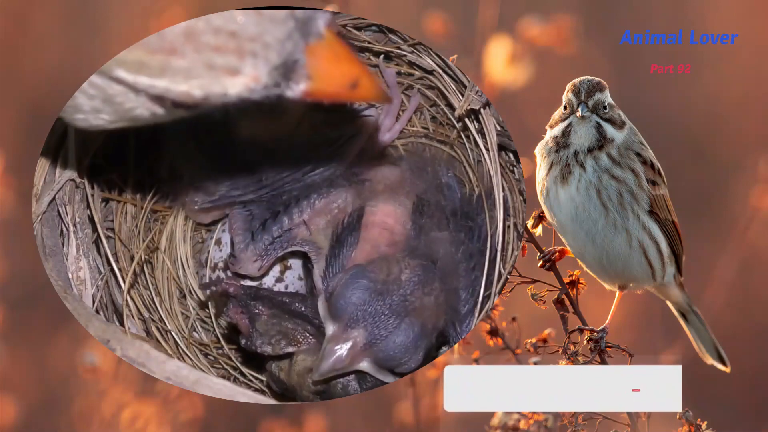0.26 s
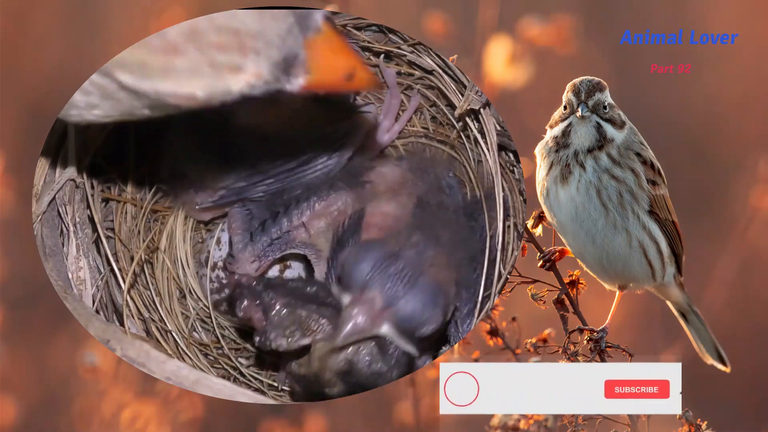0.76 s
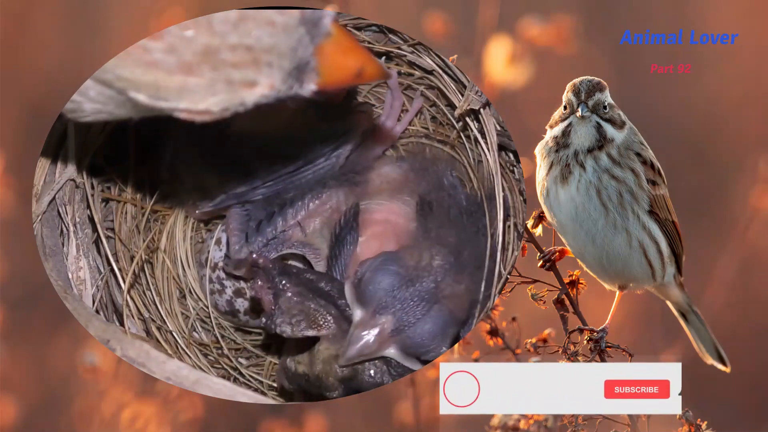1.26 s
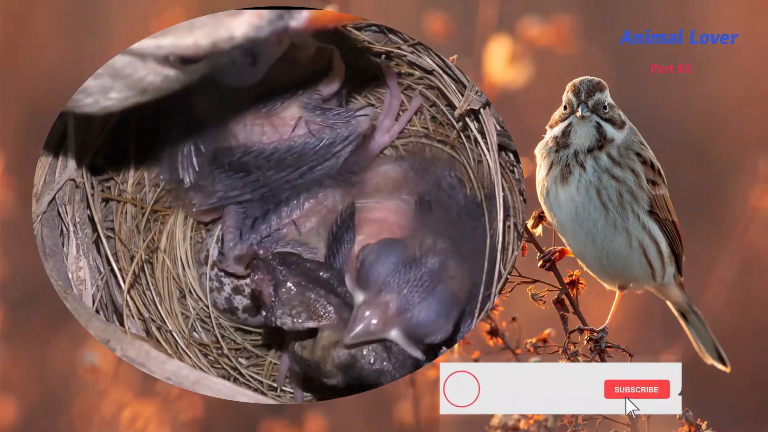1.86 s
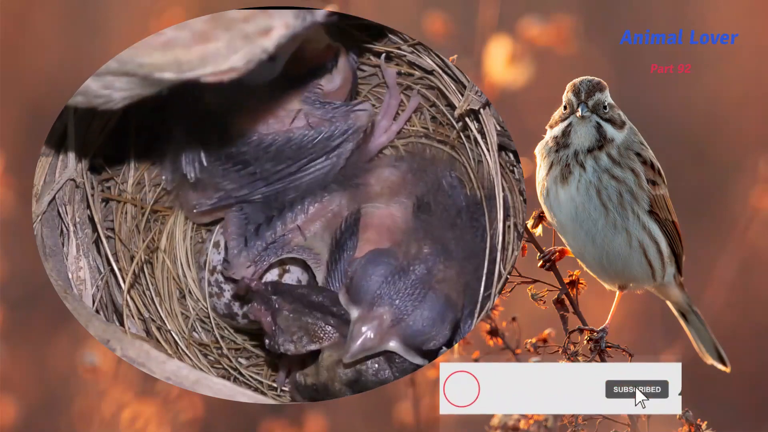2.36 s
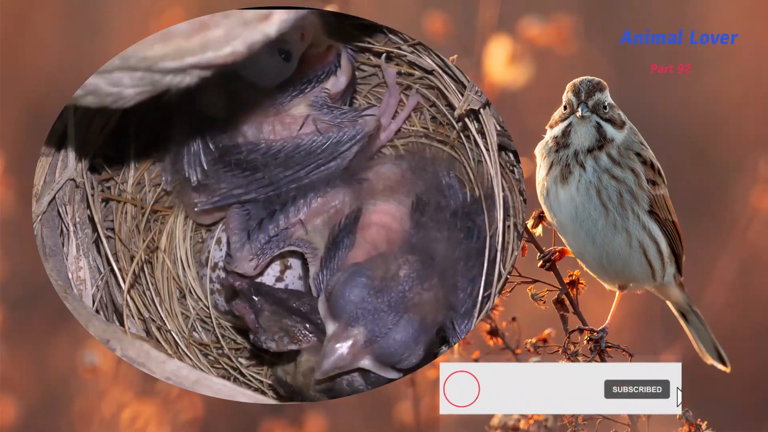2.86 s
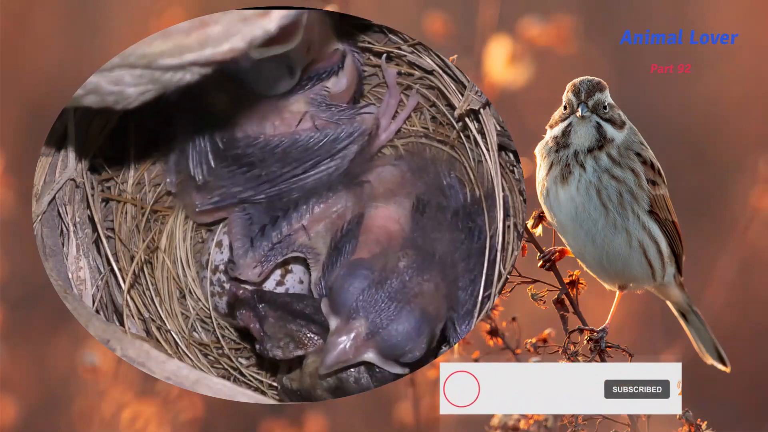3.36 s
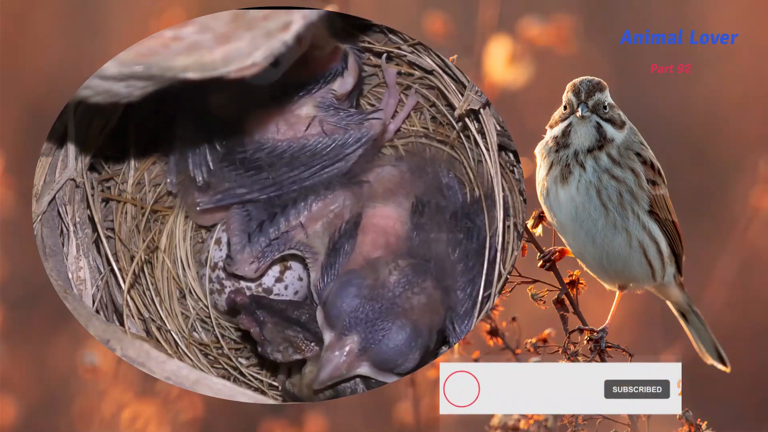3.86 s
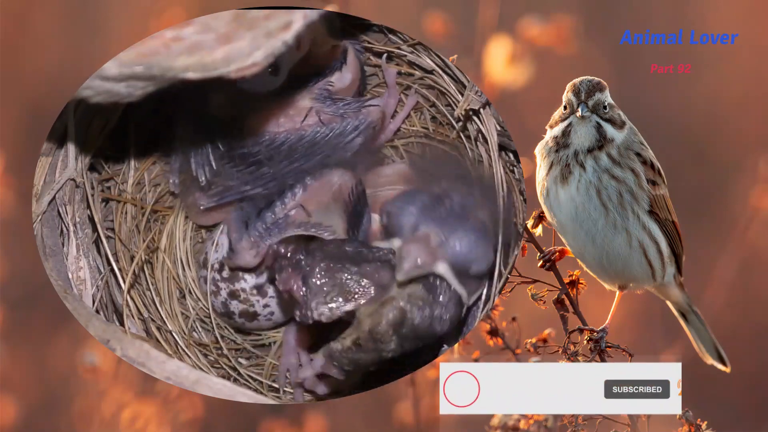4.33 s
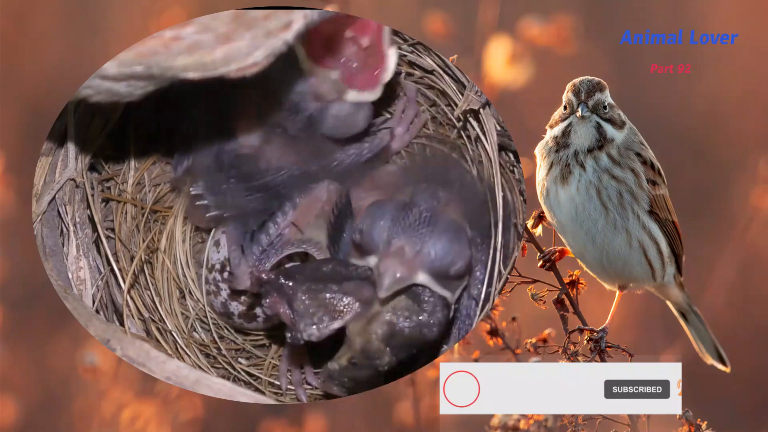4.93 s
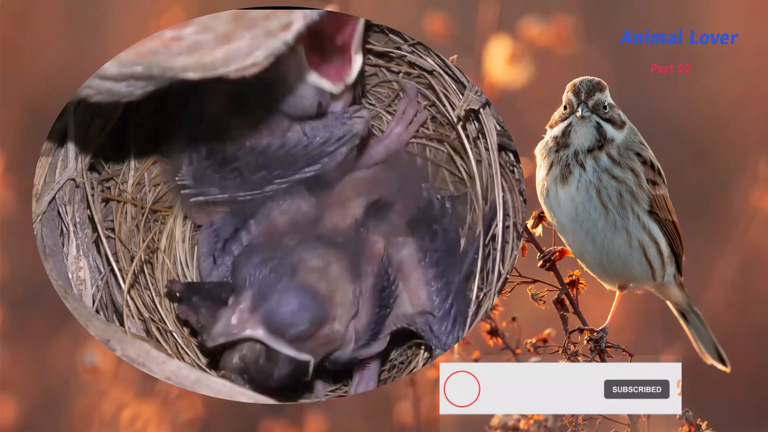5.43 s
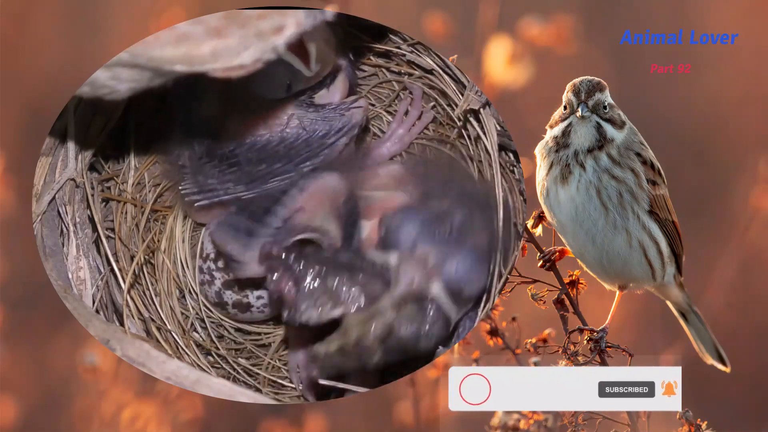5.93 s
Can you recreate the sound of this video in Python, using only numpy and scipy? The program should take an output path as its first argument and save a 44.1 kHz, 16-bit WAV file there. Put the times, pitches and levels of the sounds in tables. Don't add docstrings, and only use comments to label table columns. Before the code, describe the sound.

Very high, needle-thin chick squeaks come in four short groups, with tiny beak puffs and straw ticks above distant rumbling vehicles.

```python
import sys
import numpy as np
from scipy import signal
from scipy.fft import rfft, irfft, next_fast_len
from scipy.io import wavfile
from scipy.ndimage import uniform_filter1d, map_coordinates

SR = 44100
rng = np.random.default_rng(int(sys.argv[2]) if len(sys.argv) > 2 else 0)


def inscribe(sig):
    pcm = np.round(np.clip(np.atleast_2d(sig).T, -1, 1) * 32767)
    wavfile.write(sys.argv[1], SR, pcm.astype(np.int16))


def linear_from_db(decibels):
    return 10 ** (np.asarray(decibels, float) / 20)


N = 272979
T = np.arange(N) / SR


def unit(x):
    return x / np.sqrt(np.mean(x ** 2) + 1e-20)


def along(points, hz):
    f, v = np.transpose(points)
    return np.interp(np.log(hz + 1), np.log(f + 1), v)


def wobble(rate):
    knots = rng.standard_normal(int(N * rate / SR) + 4)
    return map_coordinates(knots, [T * rate])


def filtered(x, response):
    m = next_fast_len(x.shape[-1] + 8192)
    shaped = rfft(x, m) * response(np.fft.rfftfreq(m, 1 / SR))
    return irfft(shaped, m)[..., :x.shape[-1]]


def curved(s, value, t):
    rise = np.diff(value)
    slopes = np.pad(rise / np.diff(s), 1, "edge")
    before, after = slopes[:-1], slopes[1:]
    slope = 2 * np.clip(before * after, 0, None) / (before + after + 1e-9)
    k = np.clip(np.searchsorted(s, t) - 1, 0, len(s) - 2)
    step = s[k + 1] - s[k]
    u = (t - s[k]) / step
    leave = (1 - u) * (slope[k] * step - rise[k])
    arrive = u * (slope[k + 1] * step - rise[k])
    return value[k] + u * rise[k] + u * (1 - u) * (leave - arrive)


def rush(spectrum, alike, patchy_db):
    z = signal.stft(rng.standard_normal((2, N)), nperseg=1024)[2]
    field = uniform_filter1d(rng.standard_normal(z.shape[1:]), size=4, axis=0)
    field = uniform_filter1d(field, size=8, axis=1)
    pair = signal.istft(z * linear_from_db(patchy_db * unit(field)), nperseg=1024)[1][:, :N]

    def mid_side(hz):
        turn = np.arccos(np.clip(along(alike, hz), -1, 1)) / 2
        return linear_from_db(along(spectrum, hz)) * [np.cos(turn), np.sin(turn)]

    mid, side = filtered(pair, mid_side)
    return unit(np.array([mid + side, mid - side]))


def glides(rows, shoulder):
    out = np.zeros(N)
    for s, length, first_hz, last_hz, db in rows:
        on = (T >= s) & (T < s + length)
        u = (T[on] - s) / length
        hz = first_hz + (last_hz - first_hz) * u
        phase = 2 * np.pi * (np.cumsum(hz) / SR + rng.random())
        swell = np.abs(np.sin(np.pi * u)) ** shoulder
        out[on] += np.sqrt(2) * linear_from_db(db) * swell * np.sin(phase)
    return out


# frequency in Hz, density in dB per Hz.
AIR_HISS = [(25, -15.5), (2000, -0.5), (5500, -2.5), (10000, -1), (15700, -3), (15800, -120)]


def air():
    alike = [(3000, .3), (5000, 0.34), (5900, 0.99), (9000, 0.82), (9900, 0.9), (15000, 0.054)]
    return linear_from_db(-69.5) * rush(AIR_HISS, alike, patchy_db=-1.5)


# time in seconds, heavy engines, vans and light engines in dB.
TRAFFIC_SWELLS = [(0.0, -55, -59, -60), (0.05, -50.5, -58, -57.5), (1.28, -45.5, -47, -53.5),
                  (1.4, -50, -61, -57.5), (1.48, -45, -50, -58), (1.9, -53.5, -57, -57.5),
                  (2.88, -53, -58.5, -57.5), (3.1, -45.5, -56, -55.5), (3.69, -49, -48, -58),
                  (3.72, -49, -55, -55.5), (3.88, -44.5, -45, -53), (3.91, -39.5, -49.5, -56.5),
                  (4.14, -52.5, -50.5, -53), (4.43, -42.5, -44.5, -47.5), (4.69, -49, -51, -52),
                  (5.17, -47, -50.5, -56), (6.17, -55, -62.5, -57.5), (6.19, -57, -64.5, -59)]
# frequency in Hz, density in dB per Hz.
HEAVY_DRONE = [(18, -58.5), (30, -23.5), (48, -22), (79, -7), (102, 1), (124, 2), (170, -15), (220, -37.5),
               (370, -120)]
# frequency in Hz, density in dB per Hz.
VAN_DRONE = [(88, -39), (150, -8), (198, 1), (240, -2.5), (290, -31), (400, -120)]
# frequency in Hz, density in dB per Hz.
LIGHT_DRONE = [(150, -120), (220, -27.5), (262, -8), (296, -2.5), (372, -12), (426, -11.5), (550, -23.5),
               (720, -52.5), (1210, -120)]
# frequency in Hz, density in dB per Hz.
TYRE_ROAR = [(300, -11.5), (500, 0.5), (700, -2), (1300, 0), (1900, -3), (2300, -6), (3500, -11.5),
             (5500, -22), (9000, -49.5)]
# frequency in Hz, left-right likeness from 0 to 1.
TRAFFIC_ALIKE = [(30, .35), (60, 0.94), (130, 0.97), (290, 0.89), (640, 0.86), (1410, .62), (3100, .35)]


def traffic():
    s, *levels = np.transpose(TRAFFIC_SWELLS)
    heavy_db, van_db, light_db = (.9 * np.interp(T, s, level - level.mean()) for level in levels)
    heavy = rush(HEAVY_DRONE, TRAFFIC_ALIKE, patchy_db=0.7) * linear_from_db([[.7], [-.7]])
    vans = rush(VAN_DRONE, TRAFFIC_ALIKE, patchy_db=0.45) * linear_from_db([[-.8], [.8]])
    light = rush(LIGHT_DRONE, TRAFFIC_ALIKE, patchy_db=1.2) * linear_from_db([[-1.2], [1.2]])
    tyres = rush(TYRE_ROAR, TRAFFIC_ALIKE, patchy_db=1.1) * linear_from_db([[.3], [-.3]])
    out = linear_from_db(-47.5 + heavy_db + 0.29 * wobble(26)) * heavy
    out += linear_from_db(-52 + van_db + 0.3 * wobble(17)) * vans
    out += linear_from_db(-54.5 + light_db + 0.25 * wobble(7.7)) * light
    return out + linear_from_db(-59.5 + 0.39 * wobble(9.8)) * tyres


# frequency in Hz, width in Hz, level in dB, start in seconds.
MACHINE_TONES = [(641, 13, -79, -3), (1285, 8, -71.5, -0.5), (1330, 41, -78, 5), (2563, 2.2, -79, 1.5),
                 (1828, 8.76, -75, 4.5)]


def machine():
    out = np.zeros(N)
    for hz, width_hz, db, start in MACHINE_TONES:
        phase = 2 * np.pi * np.cumsum(hz + .4 * width_hz * wobble(25)) / SR
        fade_in = np.clip((T - start) / 0.1 + (start == 0), 0, 1)
        out += np.sqrt(2) * linear_from_db(db + 2.6 * wobble(8)) * fade_in * np.sin(phase)
    return out


# start and length in seconds, first and last pitch in Hz, level in dB.
FAR_WHISTLES = [(0, .04, 8500, 8500, -75), (4.23, .09, 3600, 3280, -80), (5.22, .04, 3800, 3750, -74),
                (5.24, .07, 3760, 3420, -76), (5.285, .11, 3460, 3150, -68.5), (5.37, .12, 3180, 2640, -75),
                (4.28, .09, 3330, 3180, -79), (4.78, .09, 1290, 1340, -67), (4.8, .09, 1540, 1720, -64),
                (4.86, .1, 1640, 1700, -64.5), (4.86, .1, 1780, 1740, -66), (5.04, .06, 1780, 1700, -70),
                (4.93, .07, 1600, 1640, -68), (5.04, .07, 1600, 1660, -65), (5.1, .06, 1560, 1620, -69),
                (4.27, .1, 1250, 1290, -67), (4.39, .08, 1260, 1400, -68), (5.02, .07, 1760, 1720, -72)]


def far_birds():
    return glides(FAR_WHISTLES, shoulder=.7) * (1 + .5 * wobble(160))


def echo(x, t60, early_db, early_t60):
    out = np.zeros((2, N + SR))
    t = np.arange(SR // 2) / SR
    hop = SR // 5
    for start in range(0, N, hop):
        decay = linear_from_db(-60 * t / t60) + linear_from_db(early_db - 60 * t / early_t60)
        tail = rng.standard_normal((2, len(t))) * decay / np.sqrt(t60 * SR / 14)
        wet = signal.fftconvolve(x[None, start:start + hop], tail, axes=1)
        out[:, start + 90:][:, :wet.shape[1]] += wet
    return out[:, :N]


# start and length in seconds, lowest frequency in Hz, shared level in dB, opposed level in dB.
BEAK_PUFFS = [(1.016, .018, 3814, -57, -52.5), (1.302, 0.0099, 3000, -58.5, -65.5),
              (1.341, .008, 3000, -60, -63), (1.907, 0.023, 3000, -64.5, -72.5),
              (2.444, .011, 2590, -60.5, -56.5), (2.465, .01, 3990, -58.5, -65),
              (3.532, .011, 3300, -56.5, -49), (4.409, .008, 3510, -64, -68), (4.439, 0.03, 2504, -63, -60),
              (4.617, .012, 2577, -53, -46.5), (4.623, 0.011, 2593, -56.5, -52)]
# start and
# length in seconds, centre in Hz, level in dB.
NARROW_PUFFS = [(.018, .008, 11500, -70), (1.33, .014, 11500, -55), (1.504, .004, 11500, -66),
                (1.51, .005, 11200, -58), (1.905, .012, 4300, -67), (1.93, .03, 11500, -71),
                (1.143, .014, 9300, -46), (.764, .01, 8500, -57), (4.628, .01, 4300, -60),
                (4.552, .012, 9000, -48), (2.02, .014, 8000, -67), (2.328, .02, 10400, -58),
                (2.515, .012, 10400, -59), (4.018, .008, 11000, -68), (2.512, .014, 12200, -61),
                (3.446, .02, 11300, -62), (3.548, .02, 10700, -57), (4.51, .045, 10100, -61),
                (4.005, .02, 9000, -70), (2.444, .01, 3600, -66), (4.697, .016, 10500, -61),
                (4.408, .012, 4300, -67), (4.616, .02, 2900, -61), (4.446, .018, 2900, -65),
                (1.017, .018, 13000, -63), (4.618, .012, 12500, -56), (2.45, .025, 14500, -69),
                (4.445, .02, 14000, -67), (1.3, .016, 13400, -63), (1.285, .045, 10200, -57),
                (3.54, .03, 10600, -56), (2.305, .04, 10200, -62), (2.452, .024, 12200, -65),
                (3.425, .03, 10200, -60)]


def rustles():
    out = np.zeros((2, N))
    top_hz = 15900
    rows = []
    for s, length, low_hz, db, side_db in BEAK_PUFFS:
        rows.append((s, length, np.sqrt(low_hz * top_hz), np.log2(top_hz / low_hz) / 2, db, side_db))
    for s, length, hz, db in NARROW_PUFFS:
        rows.append((s, length, hz, .15, db, db - 3))
    for s, length, centre_hz, octaves, db, side_db in rows:
        def band(hz):
            away = np.log2((hz + 1) / centre_hz) / octaves
            return np.exp(-away ** 8) / np.sqrt(hz + 5000)

        puff = unit(filtered(rng.standard_normal((2, 2048)), band))
        swell = np.sin(np.pi * np.clip(np.arange(2048) / SR / length, 0, 1))
        mid, side = linear_from_db([[db], [side_db]]) * puff * swell
        out[:, round(s * SR):][:, :2048] += [mid + side, mid - side]
    return out


# start and length in seconds, first and last pitch in Hz, level in dB.
HELD_TONES = [(.775, .016, 9420, 9230, -37), (1.128, .015, 9520, 9400, -28), (1.332, .012, 9000, 8900, -32),
              (2.322, .02, 9240, 9400, -30), (2.514, .016, 9340, 9280, -35), (3.434, .032, 9620, 9330, -29),
              (3.602, .013, 9330, 9260, -33), (4.522, .036, 9420, 9200, -32),
              (4.684, .022, 9400, 9400, -31)]
# start and length in seconds, first and last pitch in Hz, level in dB.
STRAY_TONES = [(.727, .013, 9580, 9600, -29), (1.016, .034, 9500, 9340, -32),
               (1.306, .014, 9780, 9080, -35), (3.412, .014, 8790, 8930, -31),
               (3.534, .011, 10650, 10000, -46), (4.448, .024, 9080, 9200, -39),
               (4.497, .03, 8800, 9250, -30), (4.618, .012, 9660, 9530, -38), (.79, .012, 9550, 9650, -49),
               (4.472, .01, 11500, 11450, -56), (4.452, .024, 11600, 11500, -66)]


def second_voice():
    return glides(HELD_TONES + STRAY_TONES, shoulder=.9) * linear_from_db(2.2 * wobble(200))


# time in seconds, pitch in Hz, level in dB.
OPENING_SQUEAKS = [
    [(.690, 8760, -41), (.7, 9050, -29), (.718, 9350, -24), (.735, 9405, -22), (.743, 9590, -17.5),
     (.757, 9735, -18), (.772, 9500, -20), (.787, 8460, -38)],
    [(2.231, 8480, -46), (2.24, 9015, -41), (2.255, 9320, -33.5), (2.27, 9150, -30), (2.295, 9220, -23.5),
     (2.31, 9345, -22), (2.33, 8880, -27), (2.344, 8460, -38)],
    [(3.345, 8550, -49), (3.354, 8900, -33), (3.364, 9110, -30.5), (3.396, 8825, -15), (3.411, 8880, -15),
     (3.423, 9235, -26), (3.435, 9395, -22), (3.464, 8480, -36)],
    [(4.446, 8640, -45), (4.456, 8830, -38), (4.472, 8955, -26), (4.487, 8800, -15), (4.512, 8810, -18.5),
     (4.527, 9240, -32), (4.54, 8900, -27), (4.548, 8700, -33), (4.556, 8480, -39)],
]
# time in seconds, pitch in Hz, level in dB.
ANSWERING_SQUEAKS = [
    [(1.025, 8825, -42), (1.04, 9110, -30), (1.053, 9130, -25), (1.075, 9220, -26), (1.092, 9425, -17),
     (1.122, 9530, -19), (1.141, 8750, -29)],
    [(1.262, 9455, -44), (1.273, 9790, -39), (1.288, 8920, -30), (1.299, 8860, -25), (1.318, 8775, -21.5),
     (1.328, 9080, -24), (1.334, 8780, -20.5), (1.341, 8050, -36)],
    [(2.447, 10060, -46), (2.453, 10000, -38), (2.46, 9810, -31.5), (2.478, 9335, -22), (2.492, 9345, -18),
     (2.505, 9385, -16.5), (2.524, 8725, -33)],
    [(3.54, 9300, -36), (3.554, 9600, -22), (3.566, 9365, -16.5), (3.58, 9470, -16.5), (3.591, 9330, -16),
     (3.6, 9190, -23), (3.612, 8740, -29.5)],
    [(4.623, 8945, -35), (4.632, 9465, -26), (4.64, 9480, -26), (4.651, 9335, -20), (4.665, 9310, -19.5),
     (4.685, 9230, -26), (4.699, 8800, -27), (4.706, 8560, -38)],
]
# time and half width in seconds, depth from 0 to 1.
VOICE_SLIPS = [(0.73, 0.0011, .8), (0.7366, .001, 0.6), (0.7769, .002, 0.94), (1.047, .002, 1),
               (1.08, 0.0043, 0.66), (1.108, .005, 0.1), (1.286, .002, .4), (1.317, .001, .5),
               (1.329, .002, .45), (1.337, .001, 0.7), (1.1325, .001, 1), (1.136, .001, 0.5),
               (2.325, .002, 0.45), (2.47, .003, 0.45), (2.484, .004, 0.4), (2.517, .002, 0.65),
               (3.378, .004, 0.3), (3.416, .002, .6), (3.557, 0.0018, 1), (3.584, .003, .25),
               (3.605, .002, 0.97), (4.469, 0.0033, 0.66), (4.63, .002, .7), (4.657, .004, .35),
               (4.687, .0015, 1)]


def chicks():
    pitch, size = np.zeros(N), np.zeros(N)
    edge_s, edge_db, scoop_hz, drop_hz = .005, 18, 230, 90
    bend = .7
    for note in sorted(OPENING_SQUEAKS + ANSWERING_SQUEAKS):
        first = np.subtract(note[0], (edge_s, scoop_hz, edge_db))
        last = np.add(note[-1], (edge_s, -drop_hz, -edge_db))
        s, hz, db = np.transpose([first, *note, last])
        on = (T > s[0]) & (T < s[-1])
        pitch[T > s[0] - .01] = hz[0]
        pitch[T > s[0]] = hz[-1]
        pitch[on] = curved(s, hz, T[on])
        size[on] = np.interp(T[on], s, linear_from_db(bend * db)) ** (1 / bend)
    for s, width, depth in VOICE_SLIPS:
        size *= 1 - np.clip(depth, 0, 1) * np.exp(-((T - s) / width) ** 2)
    tremor_db, husk_db = 1.0 * wobble(90), .12 * wobble(1600)
    size = np.abs(uniform_filter1d(size, size=110)) * linear_from_db(tremor_db + husk_db)
    phase = 2 * np.pi * np.cumsum(pitch + 24 * wobble(140)) / SR
    whistle = np.sqrt(2) * size * np.sin(phase)
    main, other = signal.hilbert([whistle, second_voice()], next_fast_len(N))[:, :N]
    power = np.abs(main) ** 2 + np.abs(other) ** 2 + 1e-8
    mirror = .16 * other ** 2 * np.conj(main) / power
    both = main + other + mirror
    return np.real(both / (1 + np.abs(both) / .8))


def nest(x, lean_db, lag, sway):
    balance = sway / 2 * wobble(35) * x
    arrival = (sway * wobble(35) - lag) * np.gradient(x)
    unlike = balance + arrival
    return x * linear_from_db([[lean_db], [-lean_db]]) + [unlike, -unlike]


def scene():
    background = traffic() + machine() + air()
    far = far_birds()
    near = linear_from_db(2.5) * chicks()
    ring = echo(near, t60=.27, early_db=12, early_t60=.06) * linear_from_db(2.5 * wobble(170))
    wet = linear_from_db(-31.3) * ring + linear_from_db(-5.5) * echo(far, t60=0.23, early_db=6, early_t60=.07)
    close = nest(near, lean_db=.75, lag=.045, sway=.11)
    return close + far + wet + rustles() + background


def masked(x, reach_db, slope_db, scatter_db):
    hz, _, z = signal.stft(x, SR, nperseg=1024)
    band = (hz // 520).astype(int)
    power = np.array([np.mean(np.abs(z[:, band == b]) ** 2, axis=(0, 1)) for b in range(band.max() + 1)])
    under_khz = np.clip(7.9 - .52 * np.arange(len(power)), 0, None)[:, None]
    scatter = scatter_db * rng.standard_normal(power.shape)
    limit = power[8:].max(axis=0) * linear_from_db(reach_db - slope_db * under_khz + scatter) ** 2
    return signal.istft(z * (power > limit)[band], SR, nperseg=1024)[1][:, :N]


def top_cut(x):
    return signal.sosfilt(signal.butter(12, 16440, fs=SR, output="sos"), x)


def record(dry):
    loud = np.abs(uniform_filter1d(dry[0] ** 2, size=1600))
    gain = (1 + loud / linear_from_db(-30) ** 2) ** -.11
    kept = masked(dry, reach_db=-45.5, slope_db=20, scatter_db=8)
    kept = filtered(kept, lambda hz: hz < 16420)
    return top_cut(kept * gain)


dry = scene()
out = record(dry)
inscribe(out)
```